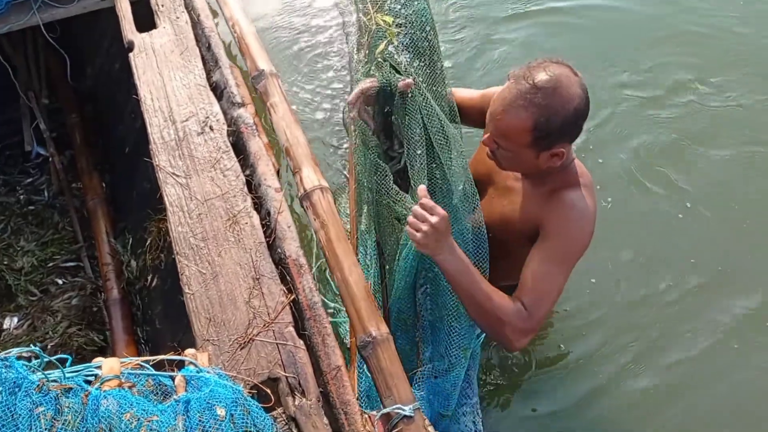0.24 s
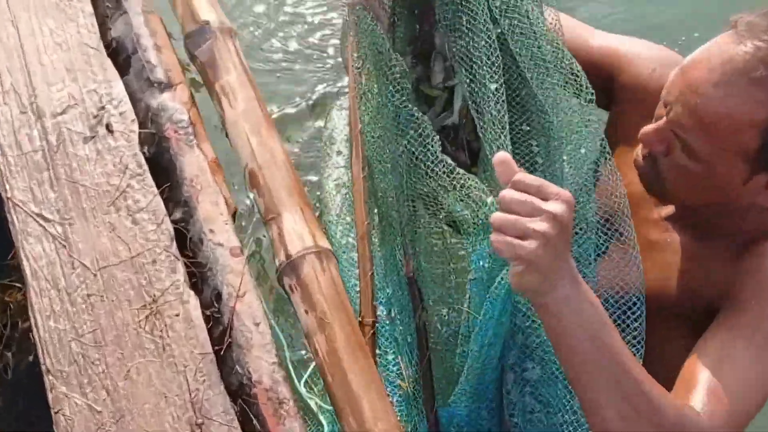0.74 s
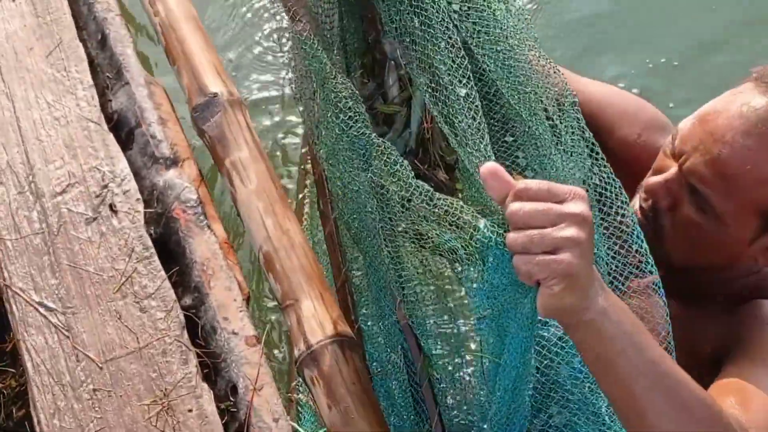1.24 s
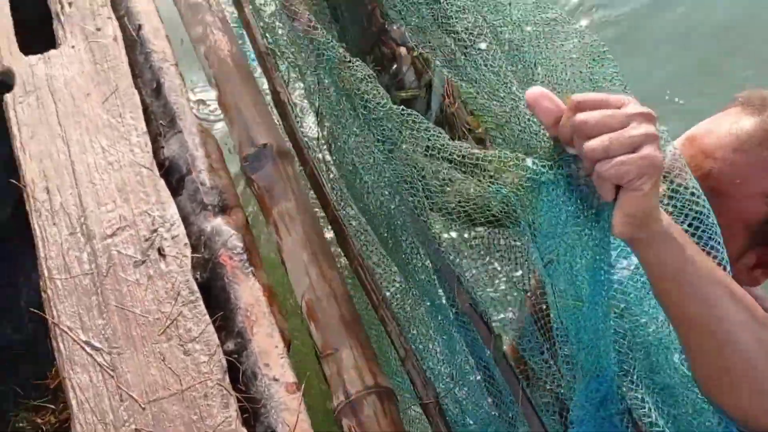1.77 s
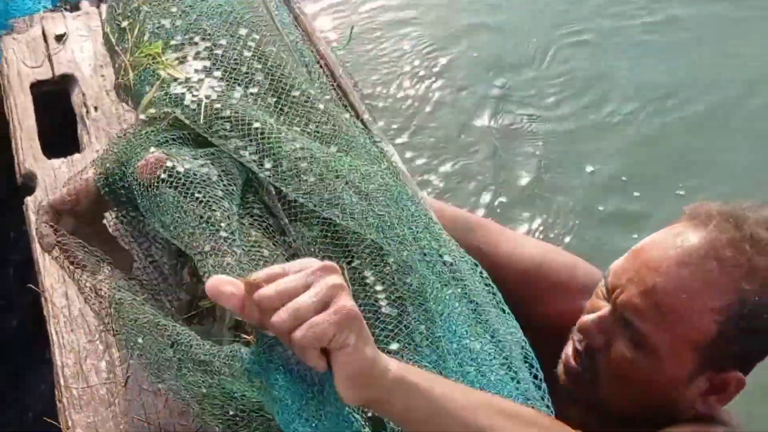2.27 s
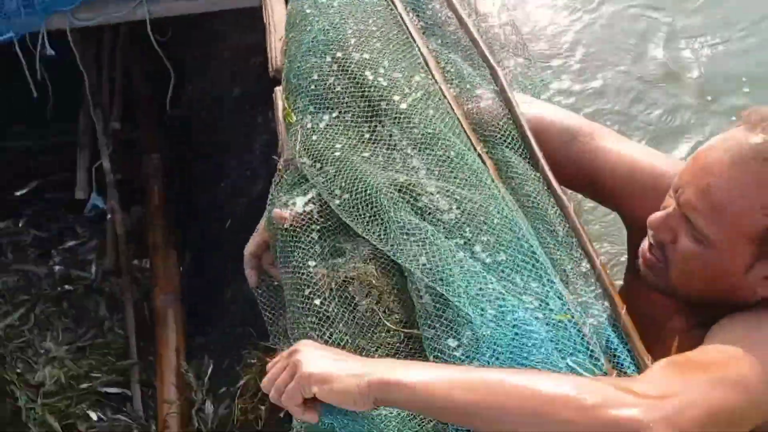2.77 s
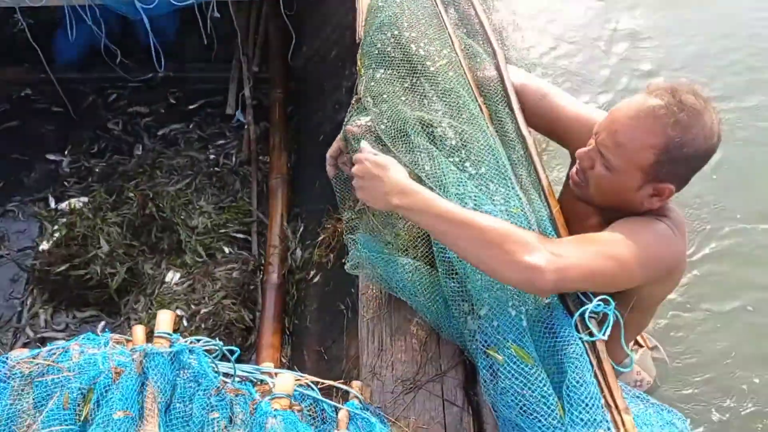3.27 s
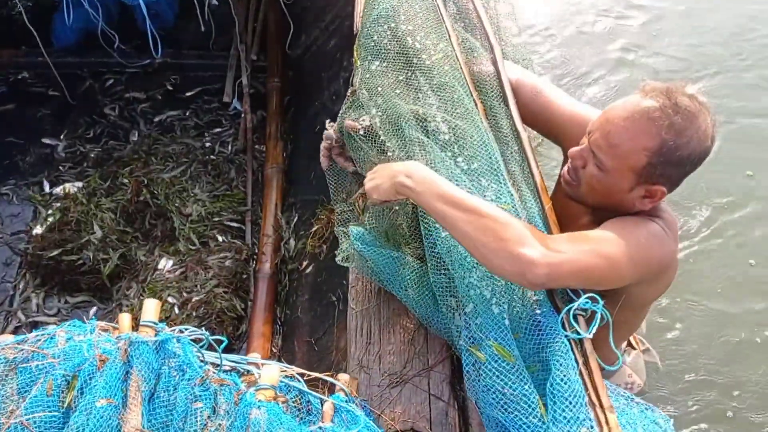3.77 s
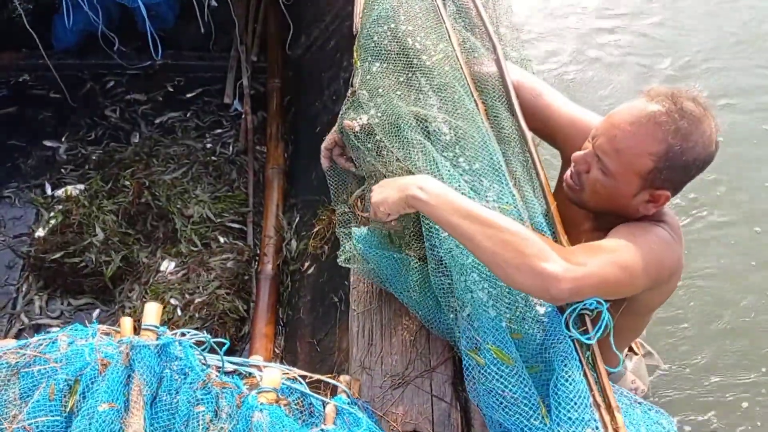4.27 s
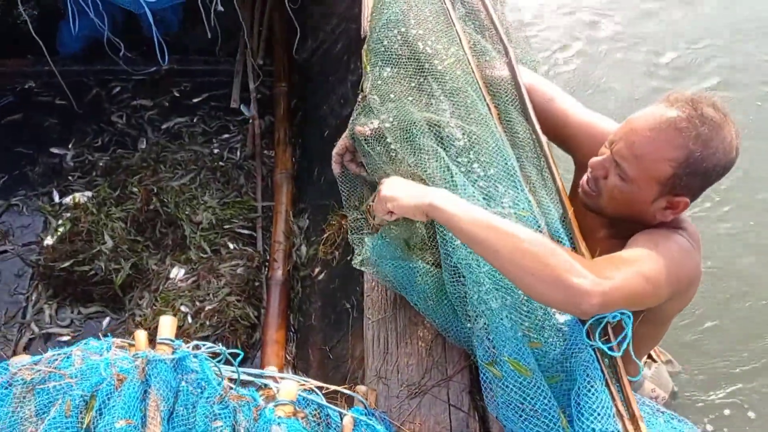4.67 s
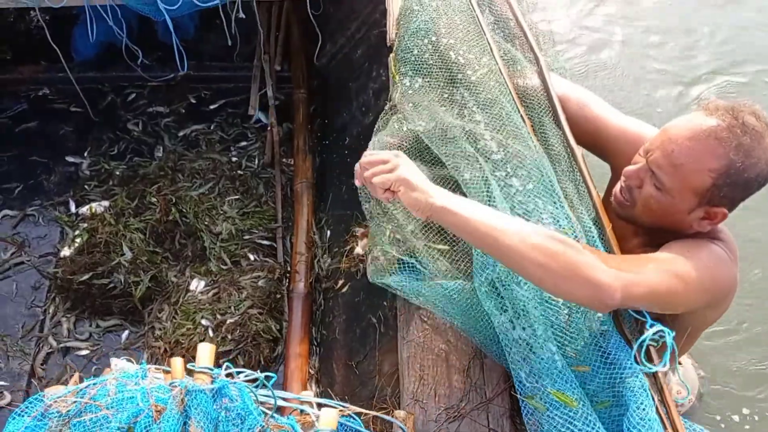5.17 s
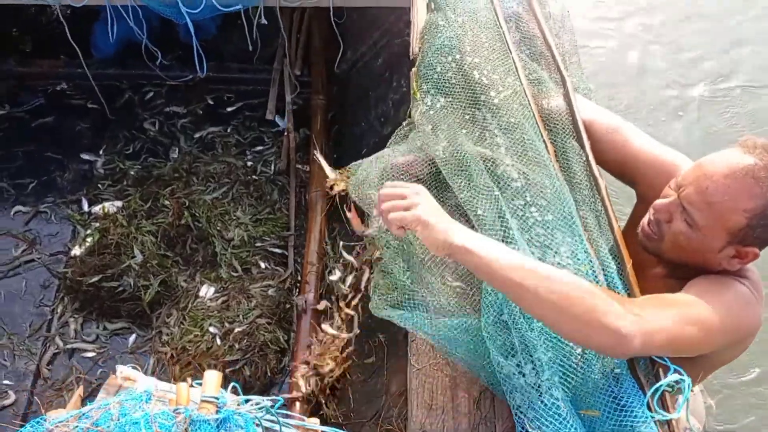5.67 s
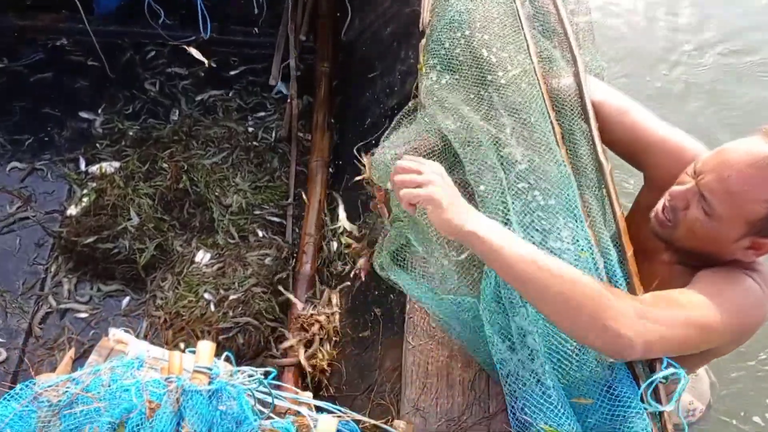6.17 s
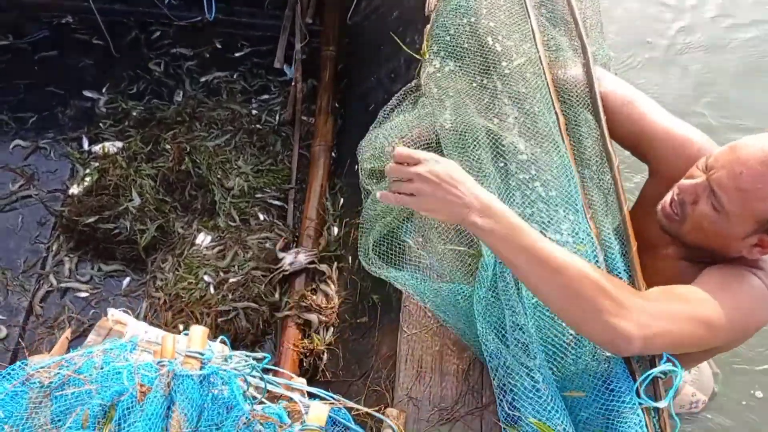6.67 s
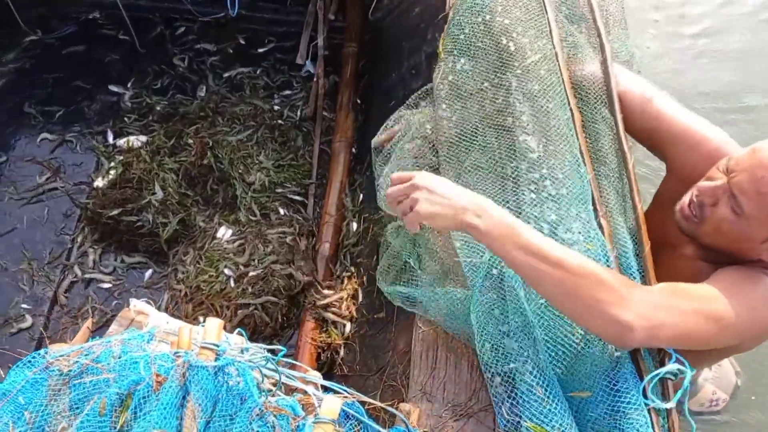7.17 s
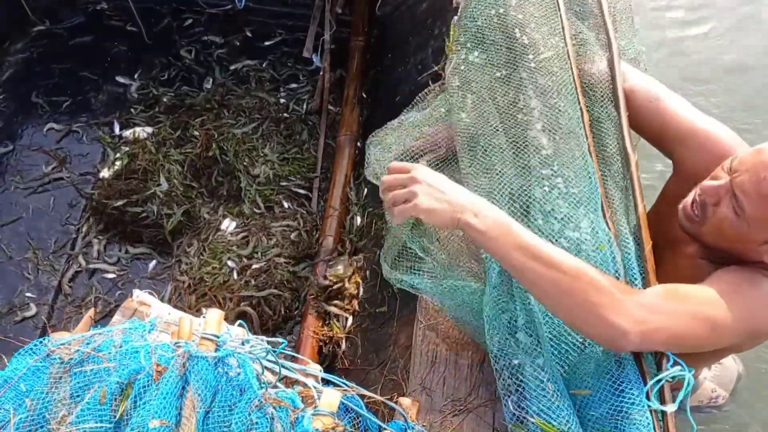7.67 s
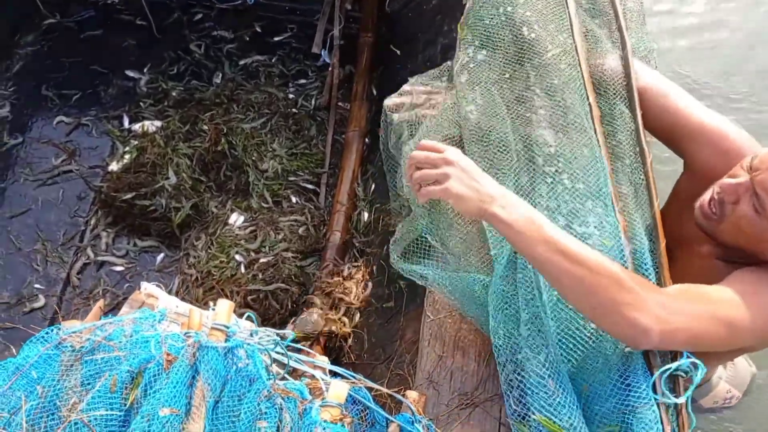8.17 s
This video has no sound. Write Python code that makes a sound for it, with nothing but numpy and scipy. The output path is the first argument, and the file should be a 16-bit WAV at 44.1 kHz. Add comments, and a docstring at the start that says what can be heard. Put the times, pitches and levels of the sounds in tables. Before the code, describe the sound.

Water streams and drips from a wet fishing net as it is lifted, falling back in small splats, gulps and ringing bubbles, with a few bumps against a wooden boat. Then the mesh rustles as it is shaken, and small fish and weed drum wetly on the hollow hull in two main bursts. A breeze rumbles on the microphone, growing toward the end. The outdoor sound is nearly mono.

```python
"""On a lagoon, a wet net of small fish is lifted and shaken out into a wooden boat.
Fish and weed drum on the hollow hull; net and hands bump the gunwale; the mesh rustles.
Water streams off the net and gulps; drops fall back as splats and ringing bubbles.
A breeze rumbles on the microphone over faint hiss. Nearly mono."""
import sys
import numpy as np
from scipy import signal
from scipy.io import wavfile
from scipy.ndimage import uniform_filter1d

SR = 44100
rng = np.random.default_rng(int(sys.argv[2]) if len(sys.argv) > 2 else 0)


def unload_audio(sound):
    """Save the sound as a 16-bit wav file, at the path given as the first command line argument."""
    columns = np.transpose(np.atleast_2d(sound))
    # keep every value between -1 and 1, then stretch to whole-number steps
    steps = np.round(np.clip(columns, -1, 1) * 32767)
    wavfile.write(sys.argv[1], SR, steps.astype(np.int16))


N = 371322

# Fish and weed on the planks. Each row: start in seconds, peak in dB, landing in ms, hardness 0-1.
LANDINGS = [(4.333, -19.5, 32.96, 1), (4.466, -32, 14.91, 0.67), (4.707, -35.5, 5.72, 0.59),
            (5.438, -32, 29.53, 0.67), (5.486, -39.5, 8.263, 0.55), (5.534, -23.5, 17.49, 0),
            (5.585, -18.5, 13.14, 0.25), (5.614, -22, 16.67, 0.66), (5.646, -25.5, 8.455, 0.35),
            (5.699, -31.5, 10.46, 0.29), (5.77, -29, 22.46, 0.48), (5.95, -30, 23.94, 0.3),
            (6.013, -40.5, 16.28, 0.38), (6.122, -41, 11.1, 0.21), (6.167, -37, 8.086, 0.94),
            (6.272, -36.5, 11.45, 0.56), (6.299, -20.5, 27.78, 0.03), (6.31, -23.5, 9.08, 0.19),
            (6.335, -28, 5.86, 0.5), (6.384, -23.5, 39.85, 0.06), (6.408, -19.5, 11.62, 0.2),
            (6.432, -15.5, 12.19, 0.05), (6.452, -32.5, 5.816, 0.36), (6.509, -41, 11.86, 0.42),
            (6.705, -40, 10.45, 0.65), (6.773, -36.5, 11.03, 0.65), (6.816, -27, 14.57, 0.36),
            (6.916, -38, 7.04, 0), (7.105, -44.5, 20.95, .33), (7.211, -43.5, 12.68, 0.35),
            (7.434, -46, 14, .3), (7.49, -36.5, 6.897, 0.45), (7.582, -44.5, 6.64, 1),
            (7.761, -43, 10.56, 0.39), (7.852, -40.5, 22.93, 0.39)]
# Each row: mode frequency in Hz, gain in dB, T60 in seconds.
HULL_MODES = [(250.86, -10.5, 0.06277), (310, -5.5, 0.02532), (367.71, 2.5, 0.063145), (436.2, -1, 0.05805),
              (555.79, -13.5, 0.05139), (717.12, -7.5, 0.02564), (866.66, -8.5, 0.04482),
              (945, -6.5, 0.01492), (1160, -11.5, 0.01291), (1584.8, -18, 0.01543), (2093.1, -24, 0.0727),
              (2602, -24.5, 0.03185)]
# Net and hands on the gunwale. Each row: start in seconds, level in dB, first and last pitch in Hz.
GUNWALE_BUMPS = [(0.0644, -38, 570.5, 100.1), (.079, -30.5, 1272, 85.03), (.131, -25, 965.6, 354.7),
                 (1.555, -34.5, 2491, 857), (2.649, -25.5, 2334, 917), (2.744, -35, 247, 111.2),
                 (2.884, -25, 348.6, 99.4), (3.058, -38, 2003, 592.1), (3.131, -28, 2097, 961),
                 (3.51, -28, 1321, 75.35), (3.612, -34, 1217, 262.8), (3.628, -32.5, 600.6, 108.9),
                 (4.535, -31, 1198, 387.9), (7.331, -35, 333.3, 110), (8.106, -31.5, 293.6, 118.7),
                 (8.153, -35, 500.5, 151.2)]
# Drops and flicks of wet mesh.
# Each row: start in seconds, peak in dB, centre in Hz, T60 in seconds, relative spray level in dB.
DROP_SPLATS = [(0.061, -48, 3743, 0.01088, -79), (0.0788, -35.5, 1796, 0.01072, -76.5),
               (0.1308, -46, 3225, 0.0531, -75), (0.2566, -38, 5190, 0.08073, -41),
               (0.7546, -39, 6489, 0.03695, -46.5), (.8222, -49.5, 1967, 0.0488, -71),
               (1.035, -48, 6647, 0.0296, -51), (1.2158, -31, 3998, 0.05668, -34),
               (1.286, -41.5, 4257, 0.02606, -66), (1.3937, -34, 6318, 0.07802, -43.5),
               (1.492, -49.5, 6075, 0.03078, -60), (1.5544, -44.5, 2519, 0.03506, -79),
               (1.708, -39.5, 2124, 0.01312, -55.5), (1.731, -47.5, 4319, 0.03043, -54),
               (1.8402, -42.5, 2764, 0.03424, -73), (1.941, -46.5, 2170, 0.0452, -53.5),
               (1.9663, -39, 2466, 0.01978, -59), (1.9985, -42, 3245, 0.01234, -66),
               (2.0182, -46, 2449, 0.02, -73), (2.155, -42.5, 2054, 0.02384, -65.5),
               (2.1887, -38, 2425, 0.0748, -55), (2.325, -31.5, 2304, 0.02778, -75),
               (2.6247, -36.5, 1864, 0.0694, -59), (3.0926, -41.5, 2297, 0.01683, -45),
               (3.2325, -40.5, 1704, 0.02226, -50), (3.278, -57, 2268, 0.02405, -53),
               (3.458, -51.5, 4161, 0.01695, -79), (3.509, -38.5, 2197, 0.02969, -72.5),
               (3.6804, -52, 2868, 0.0252, -81.5), (3.729, -36.5, 2153, 0.02412, -59),
               (3.84, -51, 4561, 0.0308, -63), (3.973, -42.5, 2407, 0.04902, -49),
               (3.903, -51, 4989, 0.02034, -60), (4.1068, -49, 4242, 0.0169, -48.5),
               (4.139, -41.5, 3759, 0.0228, -58), (4.3324, -36, 800, .06, -62),
               (5.4374, -47.5, 3608, 0.02235, -55.5), (5.5828, -40.5, 2387, 0.0302, -54.5),
               (5.6132, -32, 2059, 0.0467, -52), (5.6704, -35, 2266, 0.0789, -39.5),
               (5.7353, -43, 5878, 0.01288, -62), (5.9523, -44, 2109, 0.04455, -62.5),
               (6.2092, -44.5, 1931, 0.0314, -71), (6.3028, -37.5, 1766, 0.04514, -46.5),
               (6.4066, -35.5, 2024, 0.022, -54.5), (6.4356, -36.5, 1998, 0.037, -64.5),
               (6.735, -45, 6148, 0.01627, -71), (6.943, -51, 5442, 0.03564, -61.5),
               (6.9868, -44, 2225, 0.03477, -44.5), (7.001, -38.5, 2326, 0.06048, -50.5),
               (7.1004, -48.5, 2043, 0.03586, -51), (7.1563, -41.5, 2621, 0.02203, -47.5),
               (7.2793, -47.5, 4841, 0.05474, -79), (7.4872, -43, 3137, 0.04355, -54),
               (7.762, -43.5, 6700, .032, -52), (8.0826, -46.5, 1732, 0.02714, -57.5)]
# Bubbles left by drops. Each row: start in seconds, level in dB, pitch in Hz, lifetime in seconds.
DROP_BUBBLES = [(.287, -52, 745.9, 0.0864), (.387, -42.5, 1136, 0.05535), (.418, -46, 1338, .071),
                (.474, -37.5, 1619, 0.06219), (.498, -39, 1283, 0.06656), (.572, -42, 715.8, 0.03852),
                (.638, -51, 617.5, 0.096), (.71, -48, 1512, 0.03739), (.761, -42.5, 945, 0.12283),
                (.859, -44, 1616, 0.04561), (1.051, -43, 1569, 0.05597), (1.121, -43.5, 742.3, .13),
                (1.241, -50, 1284, .066), (1.264, -51.5, 1129, 0.0975), (1.287, -48.5, 1392, 0.0622),
                (1.305, -41, 1039, 0.1246), (1.328, -44.5, 1250, 0.05895), (1.364, -38, 1108, .075),
                (1.395, -41.5, 908.2, .1), (1.44, -53.5, 1696, 0.0995), (1.506, -36.5, 947.6, 0.05139),
                (1.855, -40.5, 856.7, .06), (2.036, -48.5, 1207, 0.04293), (2.113, -46, 701, .11),
                (2.143, -44.5, 1160, 0.06083), (2.239, -48.5, 771.5, 0.06836), (2.362, -40, 510.6, .066),
                (2.381, -28.5, 635.6, 0.07283), (2.433, -37.5, 1052, .042), (2.46, -46, 1366, 0.0907),
                (2.491, -42.5, 1071, .13), (2.53, -47, 693.8, .09), (3.091, -49, 516, 0.1936),
                (3.187, -49, 1118, .14), (3.229, -37, 1060, .055), (3.307, -48, 901.3, 0.09517),
                (3.555, -55, 590, .15), (3.725, -44.5, 1761, 0.04956), (3.81, -47.5, 1625, .036),
                (3.872, -46, 1021, .052), (3.891, -47, 829.9, 0.1152), (3.934, -44, 1258, 0.06415),
                (4.012, -52.5, 1503, .065), (4.056, -46.5, 1293, .064), (4.075, -53.5, 1078, 0.0845),
                (4.109, -56, 1316, 0.0778), (4.2, -42.5, 792, 0.14435), (4.244, -58, 1760, .1),
                (4.285, -48, 1160, 0.19336), (4.568, -49, 1213, .088), (6.678, -38, 1078, .095),
                (8.08, -47, 1628, .065)]
# Low water gulps and three narrow, ringing bubbles.
# Each row: start in seconds, relative level in dB, centre in Hz, width in Hz, length in seconds.
GULPS_AND_BUBBLES = [(0.546, -59.5, 349.7, 300.2, 0.02268), (1.356, -51, 689.9, 60.04, 0.01777),
                     (1.554, -50, 680.5, 771, 0.05166), (1.879, -47, 383.1, 292.3, 0.03482),
                     (2.196, -52.5, 310, 50.07, 0.04065), (2.622, -44, 1103, 901, 0.0355),
                     (2.643, -41.5, 477.3, 581.3, 0.0475), (2.807, -49, 562.2, 819, 0.1248),
                     (2.948, -55.5, 689.5, 910, 0.04532), (3.153, -57, 1167, 119.9, 0.0245),
                     (7.546, -51.5, 1393, 500.7, 0.02403)]
# Water running off the net. Each row: time in seconds, spray level in dB, gurgle level in dB.
RUNOFF_LEVELS = [(0, -68, -63), (.42, -65.5, -68.5), (1.1, -65, -73), (1.42, -60, -77), (1.57, -69, -58),
                 (1.77, -63.5, -79.5), (1.9, -61.5, -57), (2.05, -61, -77.5), (2.33, -62, -69),
                 (2.6, -55, -50.5), (2.68, -59.5, -48), (2.81, -64, -60), (2.92, -64, -52), (3.2, -67, -64),
                 (3.57, -77, -70.5), (3.9, -68, -77), (4.15, -75, -76.5), (4.45, -78, -78)]
# Shakes of the bag.
# Each row: peak time in seconds, mesh, weed and plank levels in dB, seconds to fade 20 dB.
BAG_SHAKES = [(4.471, -63, -52, -67.5, 0.1823), (4.529, -60.5, -55.5, -63, 0.0839),
              (4.72, -81, -57, -58.5, 0.0351), (4.96, -66.5, -75.5, -75, 0.3887),
              (5.14, -64.5, -71, -75.5, 0.4832), (5.24, -62, -66, -71, 0.0314),
              (5.34, -62, -56.5, -63.5, 0.1084), (5.44, -51, -49, -59.5, 0.0368),
              (5.544, -56, -50.5, -36, 0.2476), (5.62, -42, -39, -31, 0.0473),
              (5.674, -46.5, -47.5, -41, 0.2789), (5.96, -53, -49.5, -54.5, .18),
              (6.01, -54.5, -58.5, -56, 0.1923), (6.175, -57, -50, -63.5, .06),
              (6.301, -60, -44.5, -49.5, 0.1779), (6.399, -49.5, -38.5, -37, 0.2076),
              (6.5, -55, -61, -52.5, 0.1784), (6.745, -53.5, -66, -60.5, 0.192),
              (6.88, -51, -56, -61, 0.1324), (7.01, -54.5, -56, -66, 0.1108),
              (7.21, -61.5, -63.5, -66, 0.2155), (7.32, -60.5, -64, -64, 0.0821),
              (7.5, -60, -52.5, -56, 0.1263), (7.71, -59, -67, -56, 0.0053), (7.6, -63, -63.5, -58, 0.3224),
              (7.86, -57.5, -66.5, -59.5, 0.0027), (8.085, -59, -63, -64.5, 0.34),
              (8.179, -57.5, -74.5, -62, 0.04), (8.24, -64, -56, -57.5, .25),
              (8.32, -56, -55, -58.5, 0.0376)]
# Settling between shakes. Each row: time in seconds, mesh, weed and plank levels in dB.
SETTLING_LEVELS = [(4.3, -87.5, -84, -70), (4.8, -79, -78, -68.5), (5.2, -74, -76.5, -76.5),
                   (6.0, -73, -80, -66), (7.0, -74, -80, -66), (7.64, -68.5, -76, -58),
                   (8.42, -70.5, -74, -63)]
# Steady breeze. Each row: time in seconds, level in dB.
BREEZE_LEVELS = [(0, -54), (.3, -65), (1.0, -69), (2.4, -65.5), (2.8, -53), (3.3, -61), (3.47, -70),
                 (3.9, -63), (4.3, -69), (5.0, -57), (5.4, -64), (5.7, -55), (6.1, -60), (6.4, -50),
                 (6.7, -57), (7.7, -55), (8.15, -43), (8.42, -50)]
# Wind buffets. Each row: peak time in seconds, level in dB, seconds to swell or fade 20 dB (any sign).
WIND_BUFFETS = [(.32, -56, .04), (.66, -58, .08), (1.06, -57, -0.0232), (1.88, -59, 0.0885),
                (2.7, -52, 0.0982), (2.88, -49.5, 0.0621), (3.05, -51, 0.0989), (3.54, -50, .06),
                (3.65, -52, .04), (3.71, -52, .03), (3.77, -51, .03), (4.08, -55, 0.1046),
                (4.55, -53.5, 0.034), (4.64, -47, 0.0873), (4.83, -50, -0.0654), (4.9, -50, 0.0462),
                (5.0, -45.5, 0.0796), (5.08, -47, -0.2296), (5.31, -46.5, 0.0631), (5.6, -48, 0.1473),
                (6.24, -48, 0.0966), (6.31, -41, 0.0842), (6.44, -41, 0.0693), (6.71, -44, -0.0834),
                (6.85, -47, 0.0957), (7.08, -48, 0.004), (7.26, -46, 0.0365), (7.35, -41.5, 0.1323),
                (7.48, -46.5, -0.0194), (7.83, -46, 0.05), (7.93, -41, .05), (8.04, -37.5, 0.0504),
                (8.299, -36, 0.0466)]

# Noise spectra. Each row: frequency in Hz, relative gain in dB.
SPLAT_MIST_SPECTRUM = [(880, -41), (1500, -9.5), (2260, -10), (3640, -3), (6000, -2.5), (9000, -8.5),
                       (12300, -19), (15100, -10), (16200, -10)]
RUNOFF_SPRAY_SPECTRUM = [(940, -14), (1600, -3), (2570, -5), (2950, -8), (3790, -4), (5020, -8.5),
                         (6780, -10), (7830, -21.5), (9060, -11.5), (11700, -27), (13300, -30),
                         (15100, -15.5), (16200, -15.5)]
WET_BODY_SPECTRUM = [(150, -52), (250, 3.5), (351, 2.5), (906, 2), (1320, -4), (1600, -2.5), (1820, -27.5),
                     (2400, -11.5), (3120, -61.5), (5280, -120)]
MESH_SPECTRUM = [(940, -20.5), (1600, -5.5), (1940, -10), (2120, -6.5), (2520, -7), (2620, -7.5),
                 (3090, -9), (3720, -6), (4690, -12.5), (5860, -9), (7040, -13.5), (9700, -15),
                 (12800, -29), (15100, -15.5), (16200, -9)]
WIND_SPECTRUM = [(15, -33.5), (25, -16), (70, 1.5), (92, 4), (178, -1.5), (291, -14.5), (320, -11.5),
                 (420, -39.5), (700, -120)]
HISS_SPECTRUM = [(120, -46), (200, 7), (475, -9.5), (738, 13), (1210, -18.5), (1630, -65.5), (2880, -42),
                 (3860, -8), (7080, -11.5), (9330, -7), (13200, -44), (15100, -12), (16200, -33)]
# Faint artificial left-right treble shimmer. Each row: frequency in Hz, gain in dB.
SHIMMER_SPECTRUM = [(1500, -67.5), (3000, -57.5), (5000, -39), (9000, -31), (16000, -16)]

MESH_COLUMN, WEED_COLUMN, PLANK_COLUMN = 1, 2, 3
TYPICAL_DROP_DB = -45


def catch():
    """Each fish lands as a blow, a rough push and a wet slap; the rest slides as small blows."""
    knocks, slaps, t = np.zeros(N), np.zeros(N), np.arange(3500) / SR
    noises = rng.standard_normal((len(LANDINGS), len(t) + len(HULL_MODES)))
    for (start_s, db, landing_ms, hardness), noise in zip(LANDINGS, noises):
        u = 1000 * t / landing_ms
        push = noise[:len(t)] * u ** 0.2073 * np.exp(-3 * u ** 2)
        blow = 15.639 * hardness * (t == 0)
        cutoff_hz = 250 + 3000 * hardness ** 2  # soft bodies mute the upper modes
        force = signal.lfilter([1], [1, -np.exp(-2 * np.pi * cutoff_hz / SR)], push + blow)
        knock = hull(force, spot_db=2.215 * noise[len(t):])
        add(knocks, start_s, amp(db) * knock / abs(knock).max())
        slap_db = -40.5 + 0.4272 * db + 2 * hardness
        add(slaps, start_s, amp(slap_db - 60 * t / 0.07971) * attack(t, 0.002932))
    small_blows = patter(per_s=200, spread_db=3, grain_ms=3.321, smooth=0.573)
    slide = unit_rms(hull(small_blows)) * shake_gain(PLANK_COLUMN)
    wet = patchy(patter(per_s=1500, spread_db=4, grain_ms=0.4, smooth=0.6), depth_db=3)
    return knocks + slide + 1.1211 * slaps * unit_rms(colour(wet, MESH_SPECTRUM))


def hull(force, spot_db=np.zeros(len(HULL_MODES))):
    """Plank modes ring, weighted by the spot struck; little radiates below the lowest."""
    t = np.arange(3500) / SR
    ring = sum((-1) ** k * amp(db + spot_db[k] - 60 * t / t60_s) * np.sin(2 * np.pi * hz * t)
               for k, (hz, db, t60_s) in enumerate(HULL_MODES))
    ring = signal.lfilter(*signal.butter(2, 190, "high", fs=SR), ring)
    return signal.oaconvolve(force, ring)[:N]


def bumps():
    """Wood carries the highs first: a crack and a fast-falling tone. Low bumps ring longer."""
    out, t = np.zeros(N), np.arange(4000) / SR
    noises = rng.standard_normal((len(GUNWALE_BUMPS), len(t)))
    for (start_s, db, first_hz, last_hz), noise in zip(GUNWALE_BUMPS, noises):
        fall_ms = 1.4852 * (first_hz / 1000) ** -0.5476
        t40_s = 0.01083 * (last_hz / 1000) ** -0.5051
        pitch_hz = last_hz + (first_hz - last_hz) * np.exp(-1000 * t / fall_ms)
        swing = amp(-40 * t / t40_s) * sweep(pitch_hz)
        crack = band(noise, 0.764 * first_hz, 1.723 * first_hz)
        crack = unit_rms(band(crack, 0.697 * first_hz, 1.267 * first_hz)) * np.exp(-t / 0.000989)
        add(out, start_s, amp(db) * attack(t, 0.0002861) * (swing + 0.1383 * crack))
    return out


def splats():
    """A click and a burst in one steep resonance, wider for harder splats, under broadband mist."""
    out, t = np.zeros(N), np.arange(4000) / SR
    noise = rng.standard_normal((len(DROP_SPLATS), 2, len(t)))
    mists = unit_rms(colour(noise[:, 1].ravel(), SPLAT_MIST_SPECTRUM)).reshape(len(DROP_SPLATS), -1)
    for (start_s, db, hz, t60_s, spray_db), burst, mist in zip(DROP_SPLATS, noise[:, 0], mists):
        fade = amp(-60 * t / t60_s) * attack(t, 0.0001567)
        width_hz = 639.3 * np.exp(0.0844 * (db - TYPICAL_DROP_DB))
        impact = fade * burst + (t == 0)
        ring = band(band(impact, hz, width_hz), hz, 1.5853 * width_hz)
        add(out, start_s, amp(db) * ring / abs(ring).max() + 0.7731 * amp(spray_db) * fade * mist)
    return out


def bubbles(echo_db=-12, echo_s=0.0040202):
    """Each bubble rings as a dying, wobbling sine: sharp at first, climbing as it nears the surface."""
    out = np.zeros(N)
    noises = rng.standard_normal((len(DROP_BUBBLES), 9000))
    for (start_s, db, hz, life_s), noise in zip(DROP_BUBBLES, noises):
        t = np.arange(0, min(life_s, 0.2), 1 / SR)
        wobble = wander(noise, samples=120)[:len(t)]
        rise_oct = 0.36 + 0.0613 * (db - TYPICAL_DROP_DB)  # stronger bubbles climb further
        climb_oct = np.clip(rise_oct * (2.1 * t / life_s) ** 2.253, -1, 1.2)
        pitch_hz = hz * (1 + 0.3078 * np.exp(-t / 0.0012537) + 0.03228 * wobble) * 2 ** climb_oct
        flutter_db = 1.8 * wobble[::-1]
        fade = amp(db - 60 * t / life_s + flutter_db) * (1 - (t / life_s) ** 2)
        add(out, start_s, attack(t, 0.0007247) * fade * sweep(pitch_hz))
    return out + amp(echo_db) * np.roll(out, round(echo_s * SR))  # echo off the boat's side


def gulps_and_bubbles():
    """Ragged bursts in one steep resonance: wide ones are water gulps, narrow ones ring as bubbles."""
    out, ragged = np.zeros(N), patter(per_s=550, spread_db=-1.5, grain_ms=3.803, smooth=0.624)
    for start_s, db, hz, width_hz, length_s in GULPS_AND_BUBBLES:
        burst = ragged[round(start_s * SR):][:round(1.5 * length_s * SR)]
        u = np.arange(len(burst)) / (length_s * SR)
        ring = unit_rms(band(band(burst, hz, width_hz), hz, 1.1293 * width_hz))
        envelope = 1.6781 * u ** 0.19975 * np.exp(-2 * u ** 3)
        add(out, start_s, amp(db) * envelope * ring)
    return out


def rustle():
    """Wet strands crackle against each other; weed drags with a duller scuff."""
    strands = patchy(patter(per_s=270, spread_db=2.5, grain_ms=2.417, smooth=1), depth_db=4)
    weed = patchy(patter(per_s=300, spread_db=2, grain_ms=4, smooth=0.9), depth_db=2.5)
    crackle = unit_rms(colour(strands, MESH_SPECTRUM)) * shake_gain(MESH_COLUMN)
    scuff = unit_rms(colour(weed, WET_BODY_SPECTRUM)) * shake_gain(WEED_COLUMN)
    return crackle + scuff


def shake_gain(column, rise_s=0.03525):
    """Each shake swells fast and fades; powers add over the quiet settling."""
    shakes, t = np.array(BAG_SHAKES), np.arange(0, N / SR, 0.001)
    since_s = t[:, None] - shakes[:, 0]
    below_peak_db = 20 * np.maximum(since_s / shakes[:, -1], -since_s / rise_s)
    power = (amp(shakes[:, column] - below_peak_db) ** 2).sum(axis=1)
    return np.sqrt(gain_curve(SETTLING_LEVELS, column) ** 2 + np.interp(np.arange(N) / SR, t, power))


def runoff():
    """Water streams off the net: fine droplets in a thin spray, a duller gurgle below."""
    until_s = RUNOFF_LEVELS[-1][0]
    mist = patchy(patter(per_s=160, spread_db=7.5, grain_ms=5.211, smooth=0.6568), depth_db=2.5)
    fine_drops = plinks(1770.3, 10029, min_cycles=9.764, per_s=300, spread_db=5, until_s=until_s)
    spray = unit_rms(colour(unit_rms(mist) + 0.5638 * fine_drops, RUNOFF_SPRAY_SPECTRUM))
    wash = patchy(patter(per_s=300, spread_db=2, grain_ms=4.461, smooth=0.1306), depth_db=4.5)
    big_drops = plinks(356.48, 2293.6, min_cycles=11.108, per_s=120, spread_db=4, until_s=until_s)
    gurgle = unit_rms(unit_rms(colour(wash, WET_BODY_SPECTRUM)) + 0.7522 * big_drops)
    return spray * gain_curve(RUNOFF_LEVELS, 1) + gurgle * gain_curve(RUNOFF_LEVELS, 2)


def plinks(low_hz, high_hz, min_cycles, per_s, spread_db, until_s):
    """Droplets of many sizes, each a brief, slightly rising tone; rms 1 up to until_s."""
    out = np.zeros(N)
    for when, pitch, length, size in rng.random((2500, 4))[:round(per_s * until_s)]:
        hz = low_hz * (high_hz / low_hz) ** pitch
        u = np.arange(0, 1, hz / (SR * min_cycles * (1 + 2 * length)))
        plink = np.sqrt(u) * np.exp(-6 * u) * sweep(hz * (1 + 0.06647 * u))
        add(out, when * until_s, amp(spread_db * min(-np.log(size), 4)) * plink)
    return unit_rms(out) * np.sqrt(until_s * SR / N)


def wind(gust_db=2.5, gust_s=0.05155):
    """Low pressure puffs on the microphone swell unevenly, with single buffets on top."""
    t = np.arange(0, N / SR, 0.001)
    buffet_power = sum(amp(db - 20 * ((t - peak_s) / fade_s) ** 2) ** 2
                       for peak_s, db, fade_s in WIND_BUFFETS)
    gusts = wander(rng.standard_normal(N), samples=round(gust_s * SR))
    breeze = gain_curve(BREEZE_LEVELS, 1) * amp(gust_db * gusts)
    gain = np.sqrt(breeze ** 2 + np.interp(np.arange(N) / SR, t, buffet_power))
    puffs = patter(per_s=60, spread_db=-2.5, grain_ms=8.57, smooth=0.9764)
    return unit_rms(colour(puffs, WIND_SPECTRUM)) * gain


def hiss(rms_db=-75.5):
    """Faint, steady coloured noise."""
    return amp(rms_db) * unit_rms(colour(rng.standard_normal(N), HISS_SPECTRUM))


def patter(per_s, spread_db, grain_ms, smooth):
    """Tiny noise puffs of random size over even noise of weight `smooth`."""
    sizes = amp(spread_db * np.minimum(rng.exponential(1, N), 4))
    hits = rng.random(N) < per_s / SR
    puffs = signal.lfilter([1], [1, -np.exp(-1000 / (SR * grain_ms))], sizes * hits)
    return unit_rms(unit_rms(puffs) + smooth) * rng.standard_normal(N)


def patchy(x, depth_db):
    """Random patches of time and pitch swell and fade."""
    spectra = signal.stft(x, nperseg=256)[2]
    patches = uniform_filter1d(rng.standard_normal(spectra.shape), size=6, axis=0)
    patches = unit_rms(uniform_filter1d(patches, size=7, axis=1))
    return signal.istft(spectra * amp(depth_db * patches), nperseg=256)[1][:N]


def colour(x, spectrum):
    """Minimum-phase filter from (Hz, dB) points."""
    points_hz, points_db = np.transpose(spectrum)
    hz = np.abs(np.fft.fftfreq(8192, 1 / SR))
    gain_db = np.maximum(np.interp(np.log(hz + 1), np.log(points_hz + 1), points_db), -90)
    response = np.exp(np.conj(signal.hilbert(gain_db * np.log(10) / 20)))
    return signal.oaconvolve(x, np.fft.ifft(response).real[:4096])[:len(x)]


def band(x, hz, width_hz):
    """Two-pole resonance."""
    r = np.exp(-np.pi * width_hz / SR)
    return signal.lfilter([1, 0, -1], [1, -2 * r * np.cos(2 * np.pi * hz / SR), r * r], x)


def gain_curve(rows, column):
    """One dB column as gain per sample; -120 dB outside the table."""
    rows = np.array(rows)
    return amp(np.interp(np.arange(N) / SR, rows[:, 0], rows[:, column], left=-120, right=-120))


def wander(noise, samples):
    return unit_rms(uniform_filter1d(uniform_filter1d(noise, samples), samples))


def sweep(pitch_hz):
    return np.sin(2 * np.pi * np.cumsum(pitch_hz) / SR)


def attack(t, tau_s):
    return 1 - np.exp(-t / tau_s)


def amp(db):
    return 10 ** (np.asarray(db) / 20)


def unit_rms(x):
    return x / np.sqrt(np.mean(x ** 2) + 1e-20)


def add(mix, start_s, sound):
    part = mix[round(start_s * SR):][:len(sound)]
    part += sound[:len(part)]


def scene():
    """Mono mix plus a faint artificial left-right treble shimmer."""
    background = hiss()
    near = splats() + catch()
    mid = near + bubbles() + gulps_and_bubbles() + bumps() + runoff() + rustle() + wind() + background
    scatter = rng.standard_normal(90) * np.exp(-np.arange(90) / 25)
    shimmer = colour(signal.oaconvolve(near, scatter / np.linalg.norm(scatter))[:N], SHIMMER_SPECTRUM)
    return np.array([mid + shimmer, mid - shimmer])


def record(dry):
    """Band limit: 48 Hz to 15.9 kHz."""
    thin = signal.sosfilt(signal.butter(3, 48, "high", fs=SR, output="sos"), dry)
    lowpass = signal.firwin(511, 15900, window=("kaiser", 9), fs=SR)
    return signal.oaconvolve(thin, lowpass[None], "same")


dry = scene()
out = record(dry)
unload_audio(out)
```